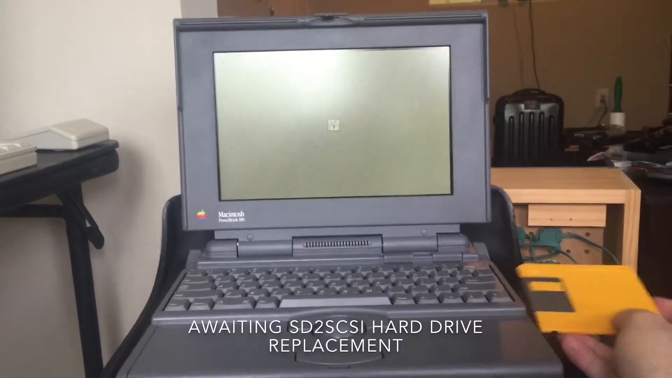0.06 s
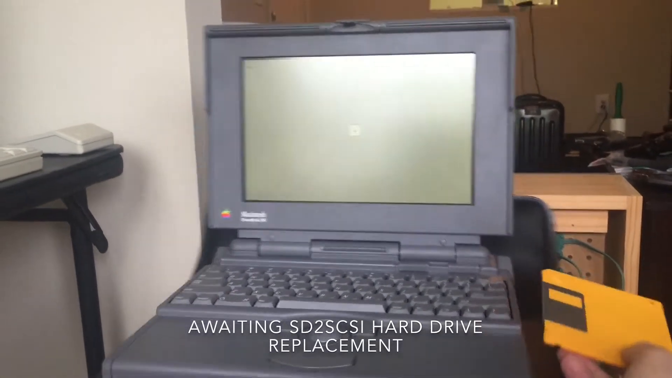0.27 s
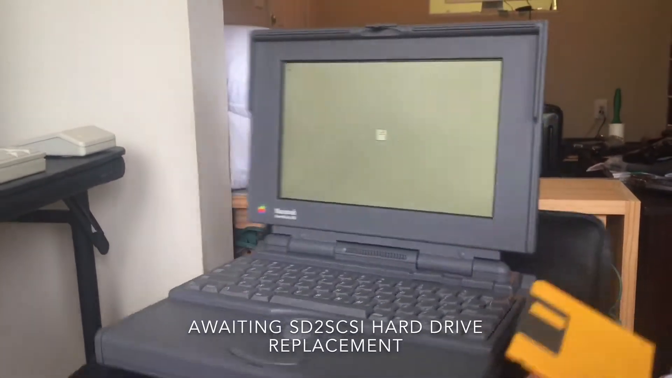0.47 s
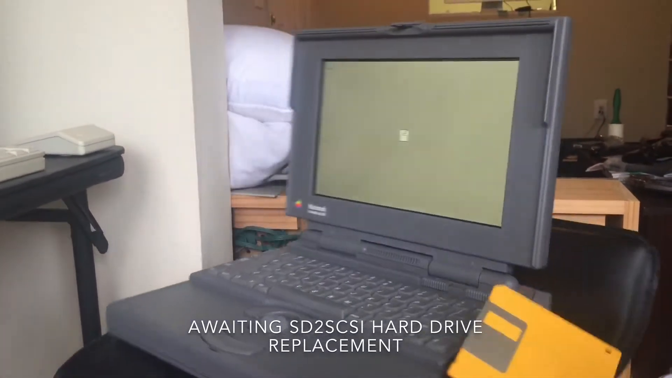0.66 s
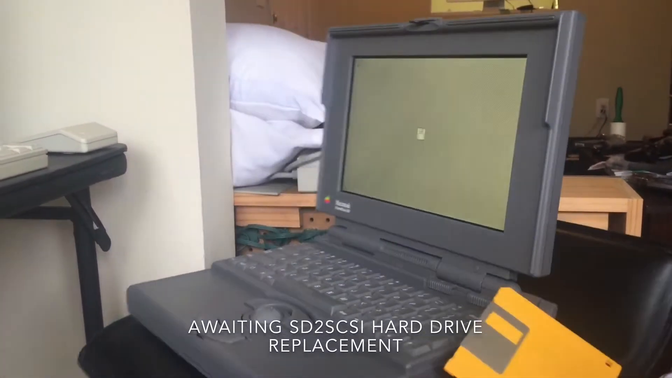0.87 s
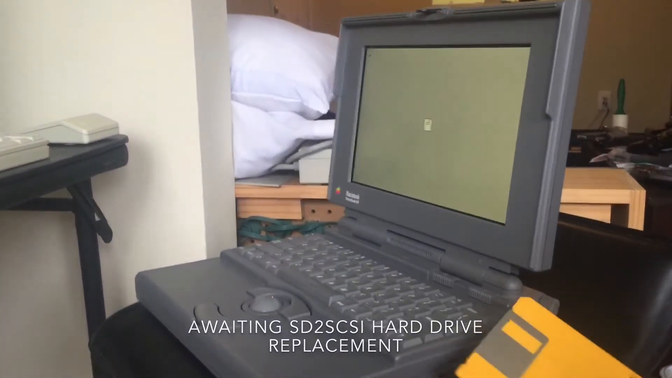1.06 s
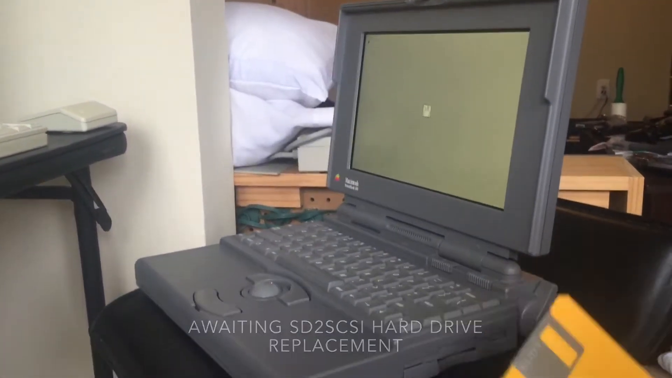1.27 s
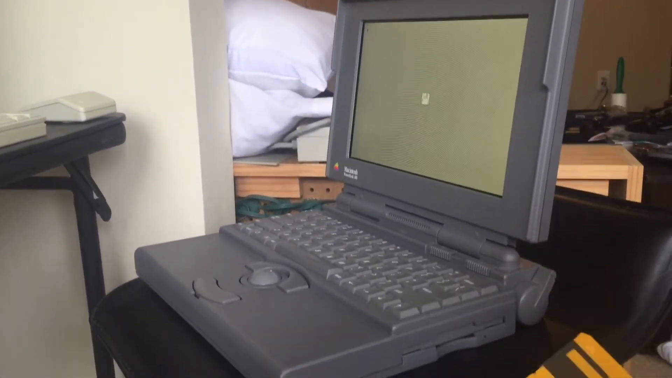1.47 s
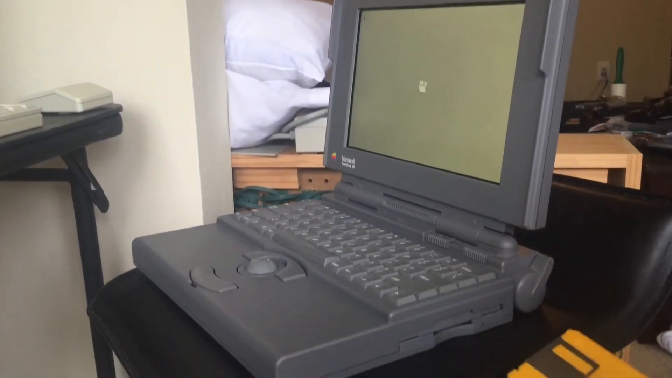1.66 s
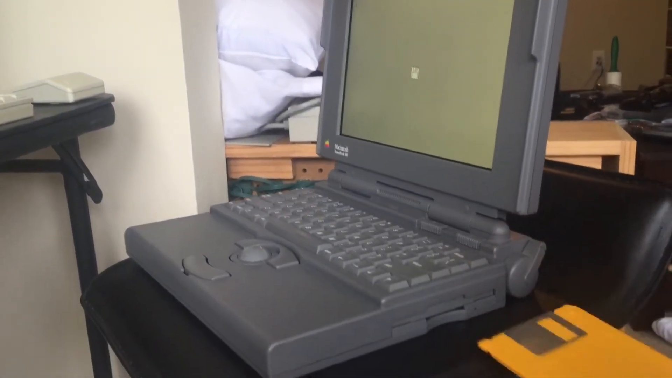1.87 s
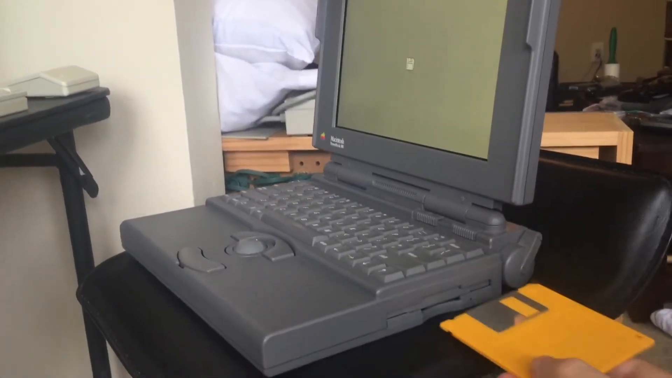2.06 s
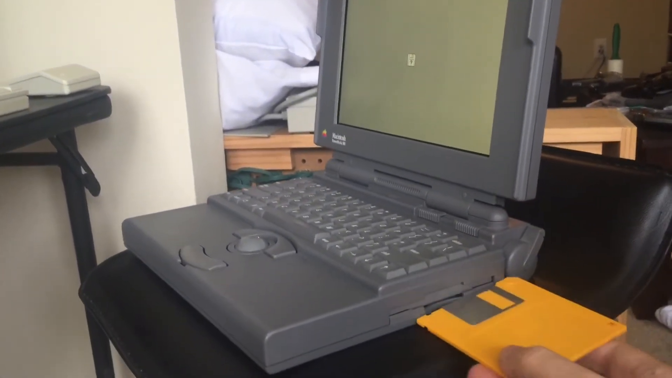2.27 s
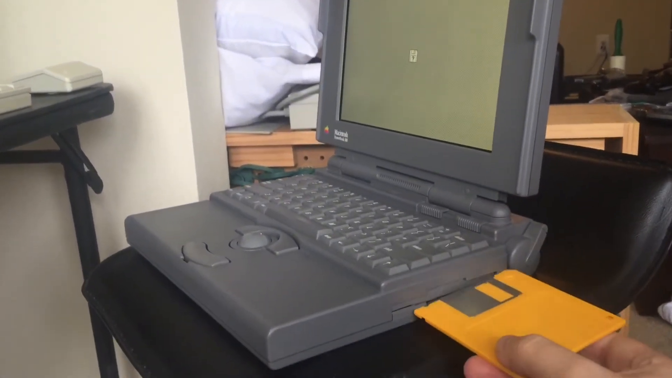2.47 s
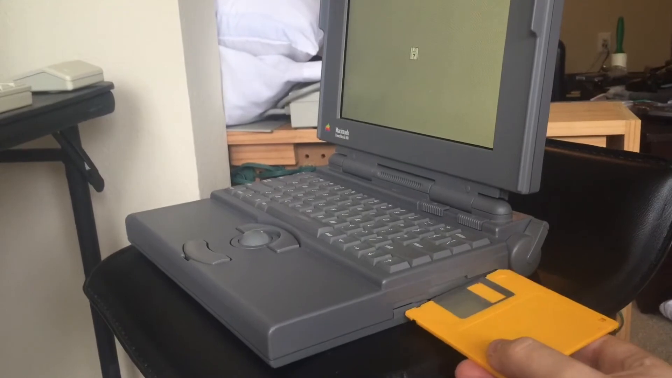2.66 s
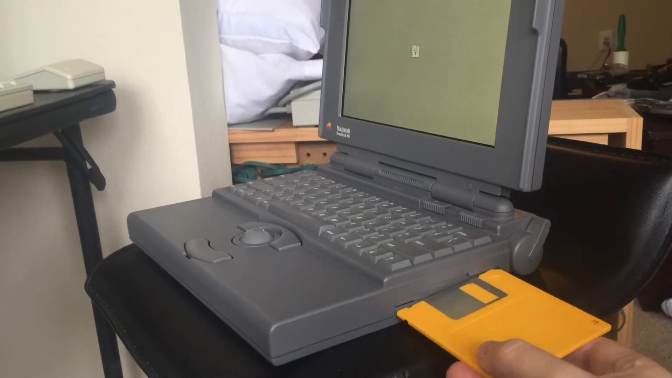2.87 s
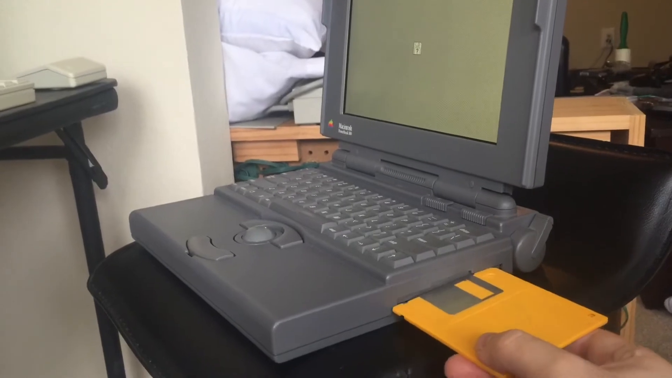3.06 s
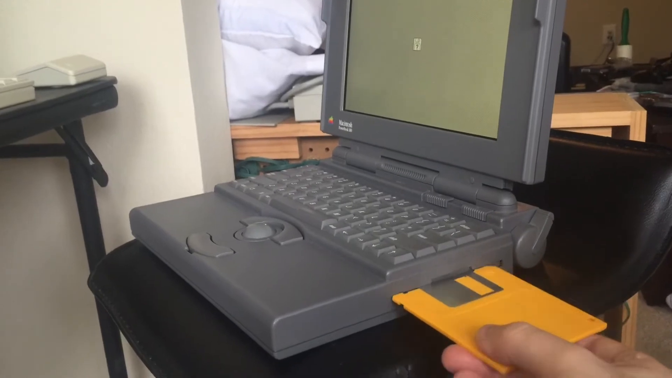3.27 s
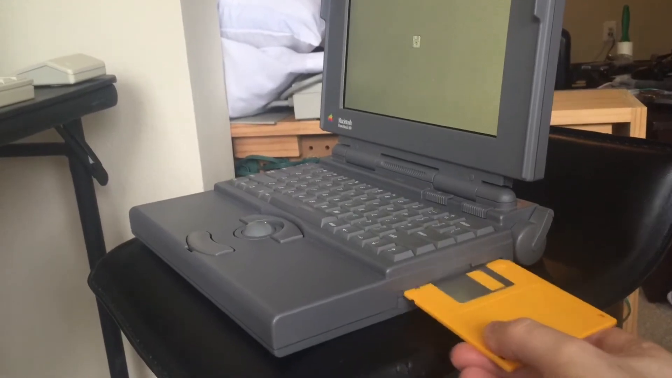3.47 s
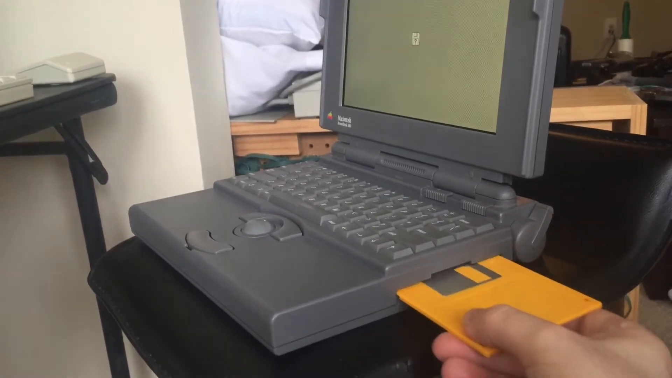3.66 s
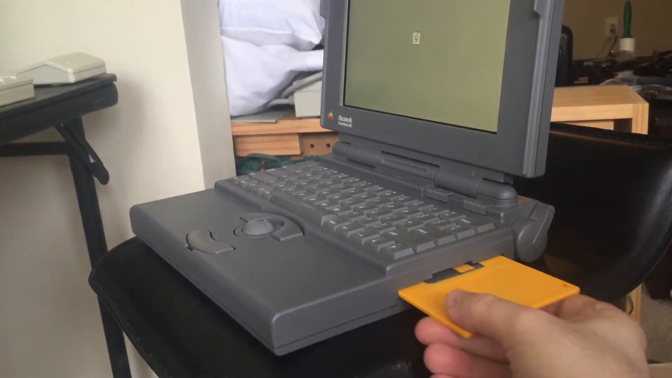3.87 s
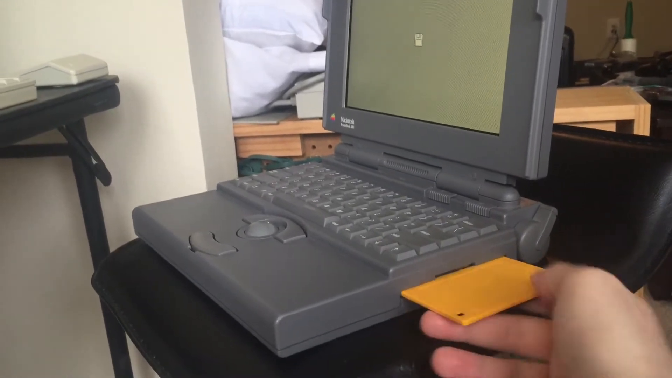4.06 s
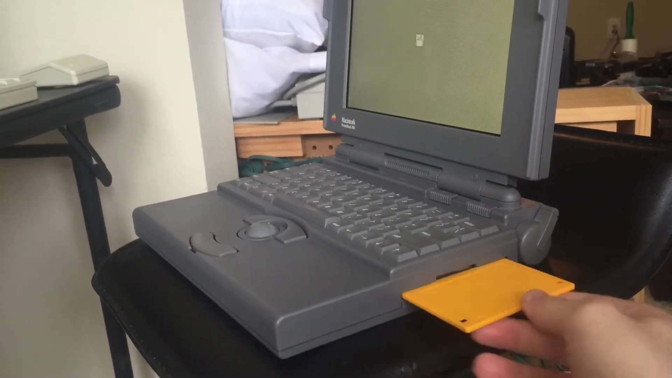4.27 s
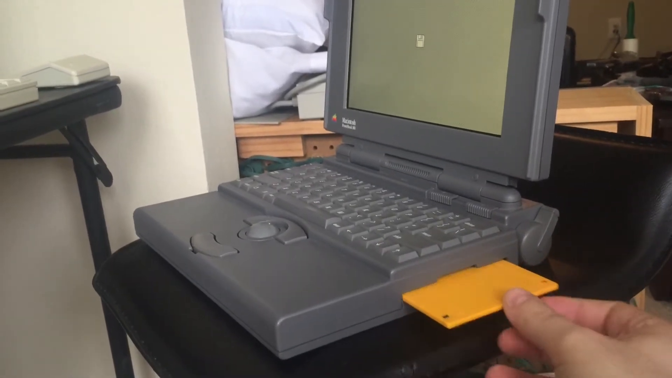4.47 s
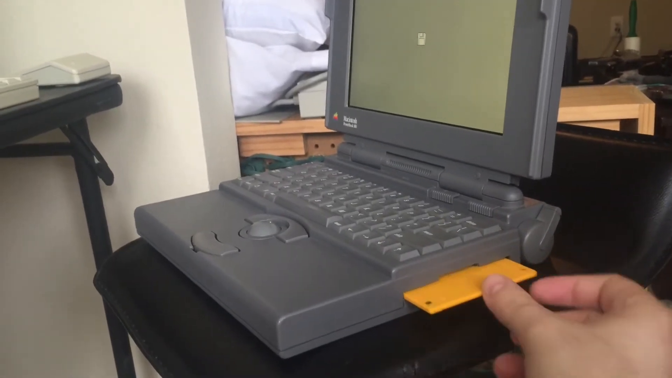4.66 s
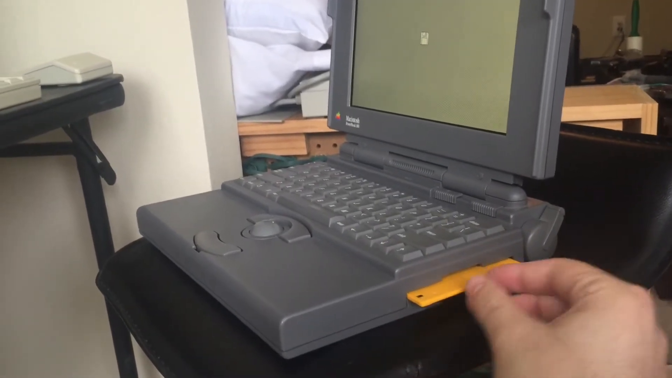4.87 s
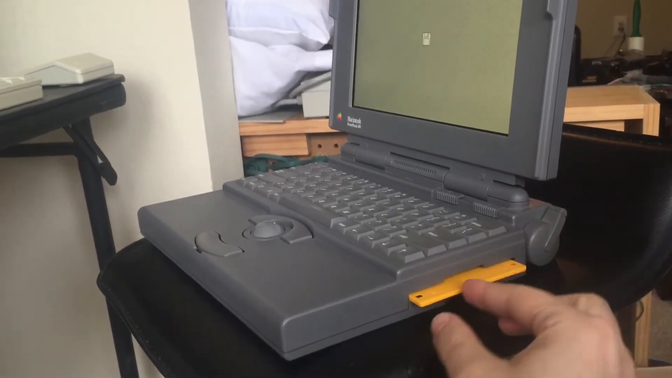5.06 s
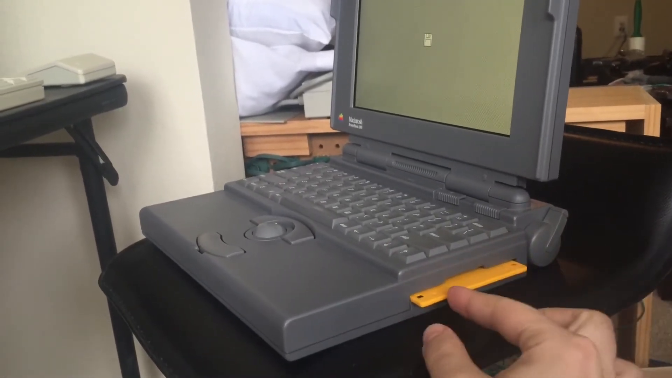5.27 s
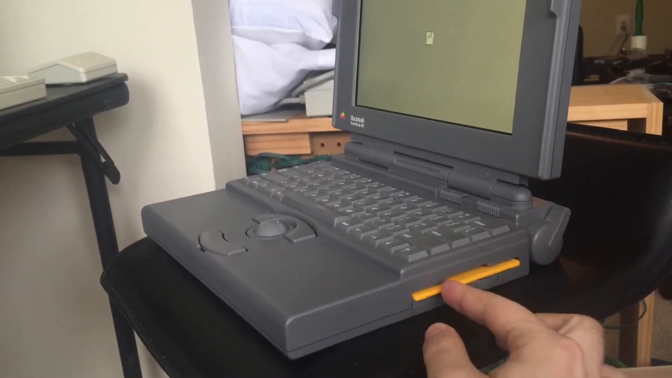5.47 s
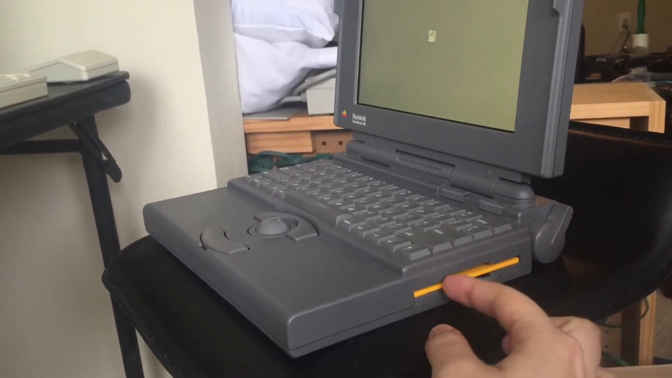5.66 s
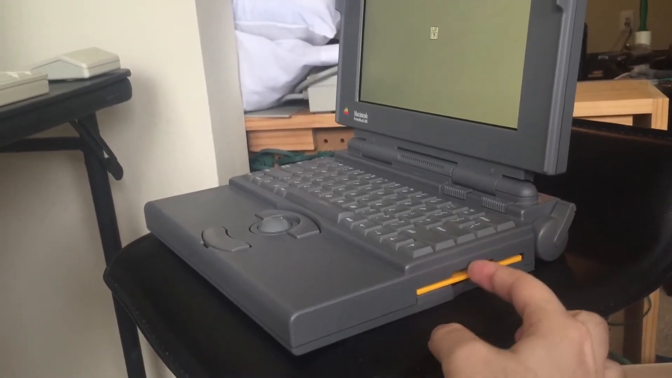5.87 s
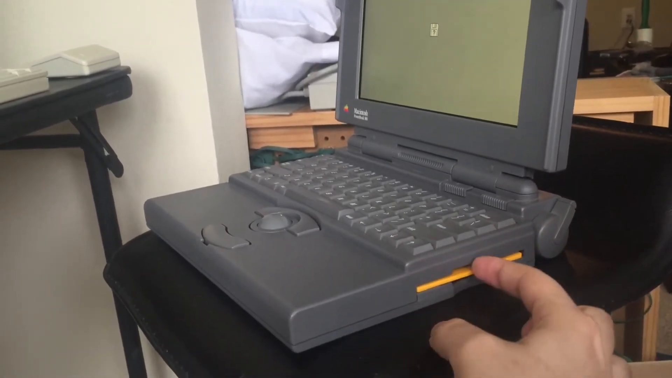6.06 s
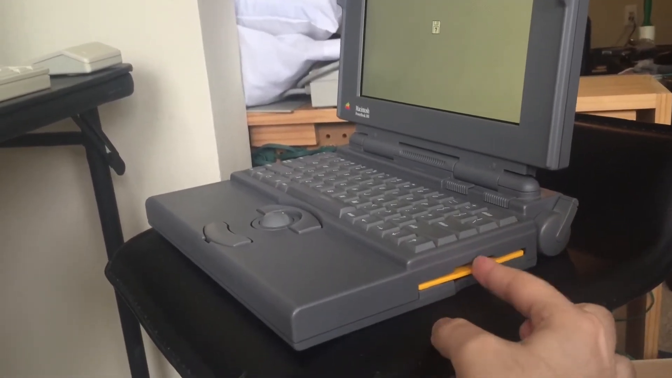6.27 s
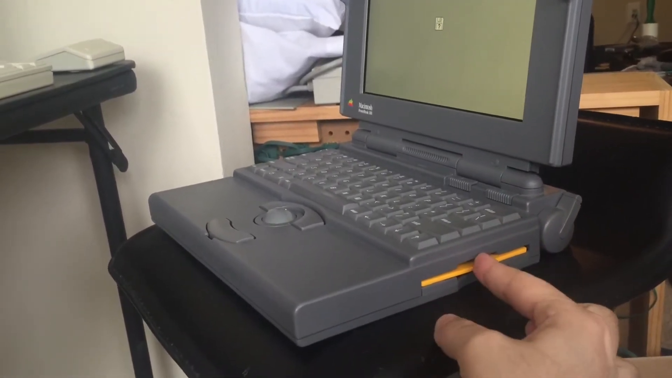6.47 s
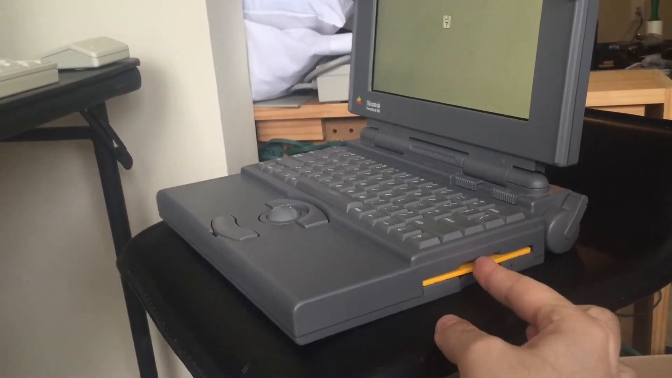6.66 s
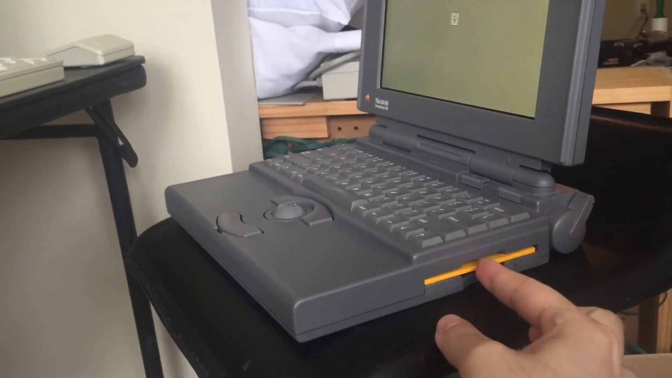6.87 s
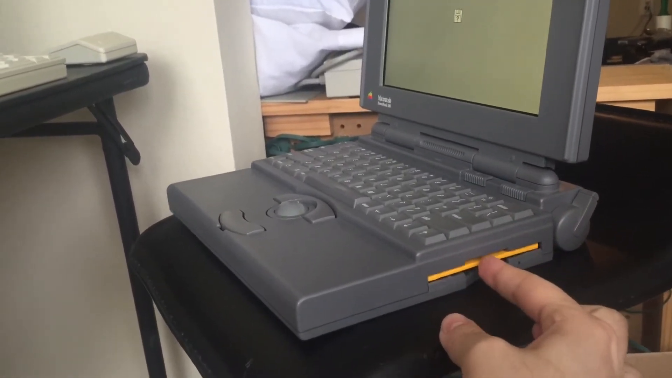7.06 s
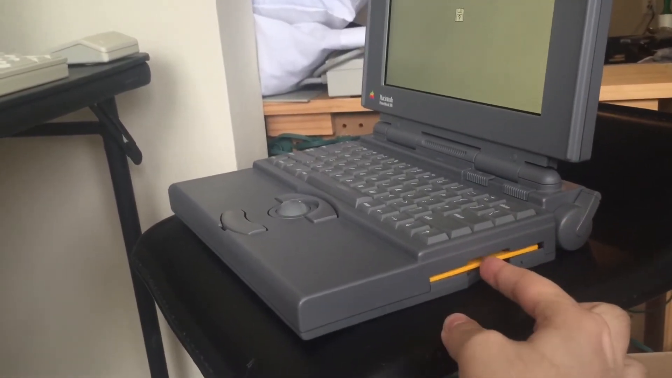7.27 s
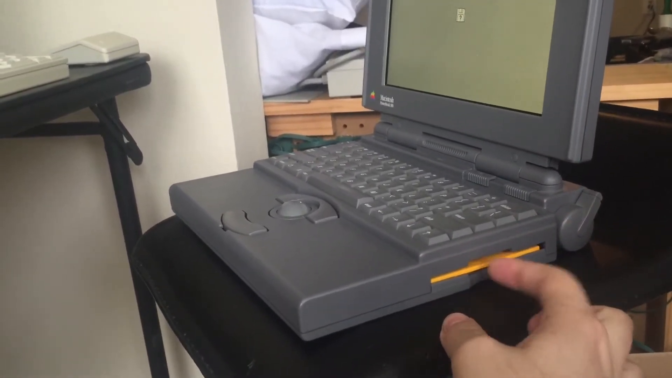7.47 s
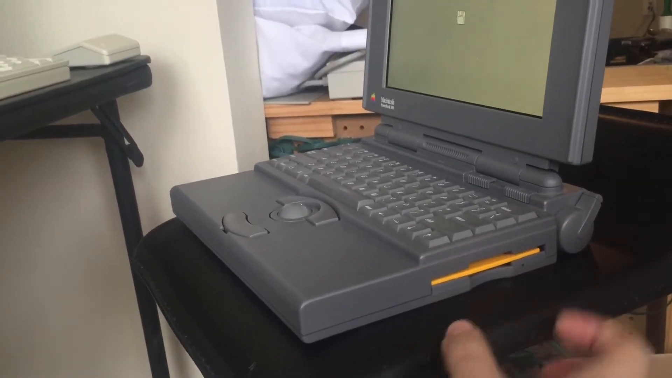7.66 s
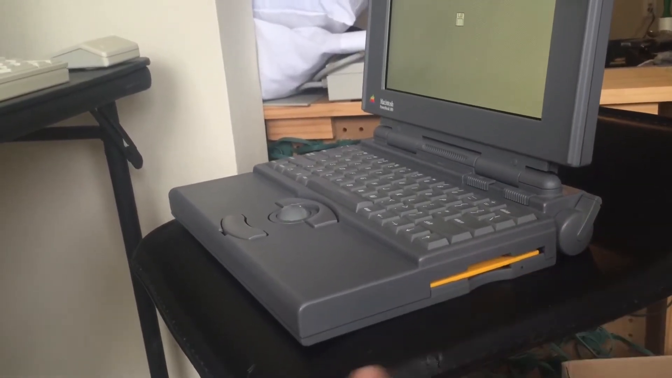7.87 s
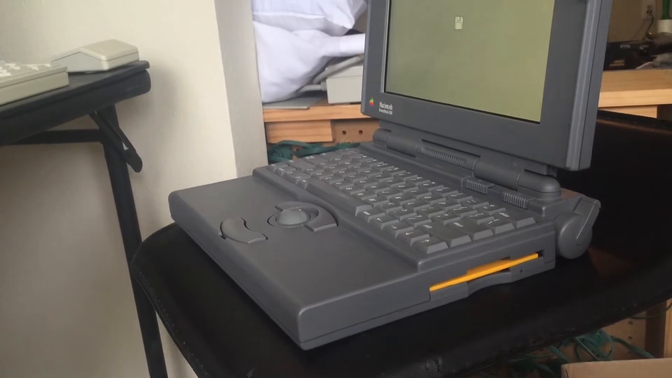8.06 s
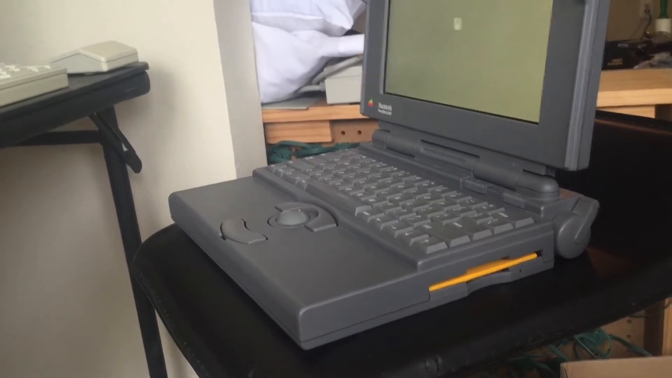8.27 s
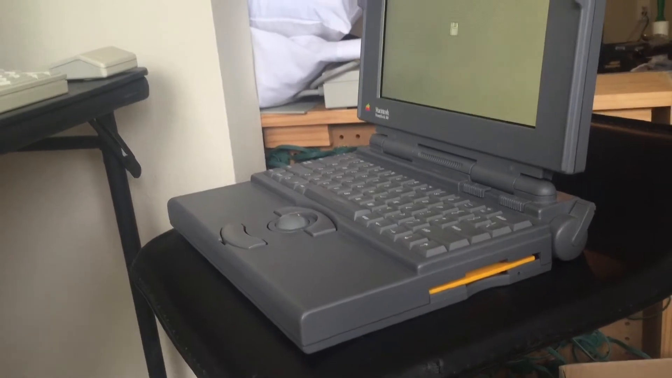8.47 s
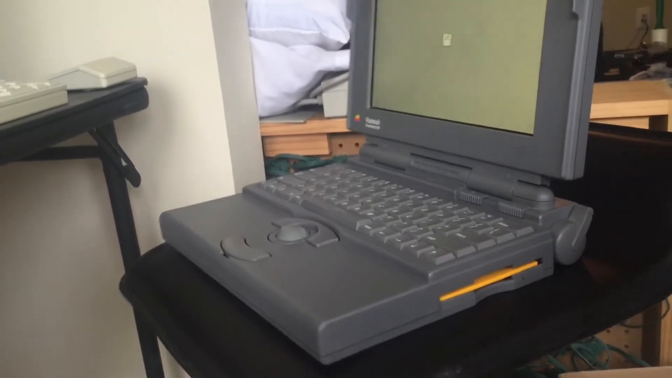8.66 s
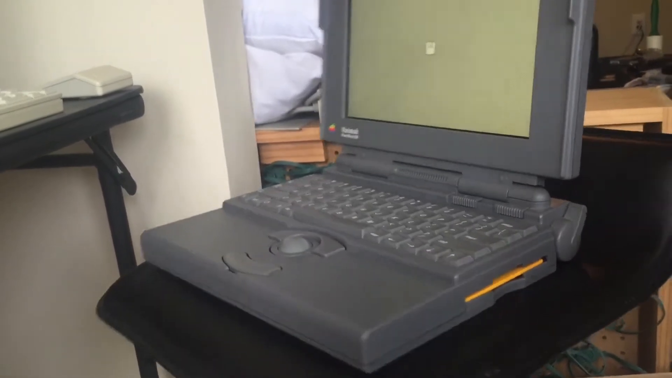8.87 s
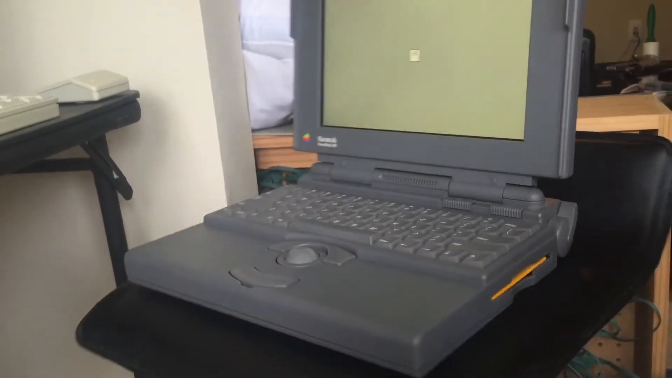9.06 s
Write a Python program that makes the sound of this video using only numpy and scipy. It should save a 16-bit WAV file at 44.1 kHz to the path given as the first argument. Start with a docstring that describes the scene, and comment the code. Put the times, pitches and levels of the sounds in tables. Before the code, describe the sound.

A plastic floppy disk taps and scrapes into a laptop slot, squeaks briefly, then snaps down with a rattling clunk in a quiet room.

```python
"""Floppy disk into a laptop slot

A hand fits a plastic disk into the side slot of a laptop on a padded stool, a phone close by.
The disk taps, scrapes and slides in, then the sprung carrier snaps down with a rattling clunk: bursts of
tiny random impacts ring damped case modes. Sines make the spring tones, thuds, low bumps and mains hum;
shaped noise makes the room tail, rumble and hiss."""
import sys
import numpy as np
from scipy import signal
from scipy.fft import rfft, irfft, next_fast_len
from scipy.io import wavfile
from scipy.ndimage import uniform_filter1d

SR = 44100
rng = np.random.default_rng(int(sys.argv[2]) if len(sys.argv) > 2 else 0)


def file_out(sig):
    """Save sig as 16-bit WAV at sys.argv[1]."""
    # one column per channel
    cols = np.atleast_2d(sig).T
    # limit, then scale
    lim = np.clip(cols, -1, 1)
    pcm = np.round(lim * 32767).astype(np.int16)
    wavfile.write(sys.argv[1], SR, pcm)


N = 401880

# Main modes of the laptop case. Each row: nominal frequency in Hz, relative level in dB, t60 in s.
CASE = [(945, 1, 0.038), (1087.5, 0.85, 0.033), (1205, 1, 0.038), (1326, 0.29, 0.035), (1457, -1, .025),
        (1549, -1.2, .025), (1643, 0, 0.03), (1771, 0, 0.028), (1952, 0, .03), (2070, 1.5, 0.028),
        (2227, 0, .025), (2444, 0, 0.021), (2720, -1.4, 0.017), (2980, -4, 0.018)]
# Low, hollow case modes. Each row: nominal frequency in Hz, relative level in dB, t60 in s.
HOLLOW = [(364, -11, 0.03), (419, -3, .035), (516, -1, 0.036), (601, -0.5, .045), (680.6, -2.5, 0.035),
          (810, -4, .035)]
# Bright case modes. Each row: nominal frequency in Hz, relative level in dB, t60 in s.
BRIGHT = [(3350, -4.5, .006), (3730, -1, 0.0074), (4070, 0, 0.0099), (4434, 0.5, 0.0077), (4750, 1, .006),
          (5330, 1, 0.006), (5660, -0.5, 0.0063), (6155, -4.5, 0.0054), (6970, -6.5, 0.0056)]
# Crisp top modes. Each row: nominal frequency in Hz, relative level in dB, t60 in s.
CRISP = [(7680, -5, 0.003), (8430, -4, 0.0018), (9750, -3.5, 0.0038), (10160, -1.5, 0.0027),
         (11400, -2.5, 0.0037), (12600, -5.5, .002), (13900, -4.5, 0.0022), (15000, -7.5, 0.0018)]
PARTS = CASE, HOLLOW, BRIGHT, CRISP


def undb(db):
    """Decibels to gain."""
    return 10 ** (np.asarray(db) / 20)


def unit(x):
    """Scale to rms 1."""
    return x / np.sqrt(np.mean(x ** 2))


def fade(t, t60):
    """Exponential decay, 60 dB down at t60."""
    return np.exp(-np.log(1000) * t / t60)


def add(out, start_s, x):
    """Mix x into out from start_s."""
    i = int(start_s * SR)
    out[i:i + len(x)] += x[:N - i]


def slow(rate_hz):
    """Smoothed noise, rms 1, that changes about rate_hz times a second."""
    return unit(uniform_filter1d(rng.standard_normal(N), size=int(SR / rate_hz)))


def ring(modes, chance, focus_hz=None):
    """Modal impulse response; the place of contact detunes and weighs modes and favours those near focus_hz."""
    focus_octaves, focus_db = 0.5, 10
    hz, db, t60 = np.transpose(modes)[:, :, None]
    if focus_hz:
        db = db + focus_db * np.exp(-(np.log2(hz / focus_hz) / focus_octaves) ** 2)
    t = np.arange(int(t60.max() * SR) + 1) / SR
    detune, weigh = chance[:2 * len(modes)].reshape(2, -1, 1)
    push = np.minimum(t * hz / 1.5, 1) ** 2  # plastic gives: the blow lasts about a cycle
    tones = np.sin(2 * np.pi * hz * (1 + 0.016 * detune) * t)
    return (undb(db + 1.8 * weigh) * push * fade(t, t60) * tones).sum(axis=0)


def contacts(table, rise, sparse):
    """Each contact is a burst of tiny impacts that rings the four parts of the case."""
    level_ms = 8  # a part's level is its rms over this time, or over the nominal length if longer
    out = np.zeros(N)
    size = SR // 8  # longest burst: 125 ms
    chance = rng.standard_normal((len(table), size))
    places = rng.standard_normal((len(table), 4, 32))
    for row, grit, place in zip(table, chance, places):
        start_s, db, focus_hz, hollow_db, bright_db, crisp_db, ms = row
        u = np.arange(min(int(ms * SR / 700) + 1, size)) / (ms * SR / 1000)  # time in lengths
        hits = grit[:len(u)]
        envelope = np.minimum((u + .01) / rise, 1) * np.exp(-u ** 4)
        impacts = np.abs(hits) ** sparse * np.sign(hits) * envelope
        root_samples = np.sqrt(max(ms, level_ms) * SR / 1000)
        shares_db = 0, hollow_db, bright_db, crisp_db
        for share_db, modes, at, hz in zip(shares_db, PARTS, place, (focus_hz, None, None, None)):
            part = signal.fftconvolve(impacts, ring(modes, at, hz))
            add(out, start_s, undb(db + share_db) * root_samples * part / np.linalg.norm(part))
    return out


def background():
    """Room air and hiss, a low rumble that swells and sinks, and slightly wavering mains lines."""
    # Noise spectrum. Each row: frequency in Hz, relative density in dB per Hz.
    air_rows = [(20, -23.5), (43, -3.5), (62, 0), (85, -3.5), (100, -12.5), (150, -17), (210, -15),
                (400, -23.5), (760, -25), (1950, -30), (2500, -35), (4500, -38), (10500, -44.5),
                (15500, -45.5)]
    # Rumble level ahead of its random swells. Each row: time in s, relative level in dB.
    rumble_rows = [(0, -63), (1.1, -66), (1.9, -65), (2.8, -65.5), (4.4, -60), (5.7, -63.5), (7, -62),
                   (8, -63.5), (9.11, -64)]
    # Mains lines. Each row: frequency in Hz, level in dB rms ahead of the waver.
    hum_rows = [(60, -73.5), (120, -71.5), (240, -79.5), (360, -81.5)]
    air_db = -64
    lumpy_db, lumps_per_s = 2, 4.6
    size = next_fast_len(N)
    f, t = np.fft.rfftfreq(size, 1 / SR), np.arange(N) / SR
    hz, db = np.transpose(air_rows)
    noise = rfft(rng.standard_normal(size)) * undb(np.interp(np.log(f + 1), np.log(hz), db))
    low = 1 / (1 + (f / 88) ** 12)  # split near 88 Hz
    air, rumble = (unit(irfft(noise * share, size)[:N]) for share in (1 - low, low))
    dull = signal.lfilter(*signal.butter(2, 330, fs=SR), air)
    air = air + (undb(3.9 * slow(12) - 1) - 1) * dull  # the lower air is lumpy
    rumble = rumble / np.sqrt(uniform_filter1d(rumble ** 2, size=int(.3 * SR)) + 0.35)  # even out swings
    hum = sum(undb(g) * np.sqrt(2) * np.sin(2 * np.pi * h * t) for h, g in hum_rows)
    air = undb(air_db + 0.77 * slow(2.5)) * air
    rumble_db = np.interp(t, *np.transpose(rumble_rows)) + lumpy_db * slow(lumps_per_s)
    return air + undb(rumble_db) * rumble + undb(0.98 * slow(4)) * hum


def thuds():
    """Dull blows through the stool, and its longer wobble: each a low, damped swing."""
    # Thuds. Each row: start in s, level in dB ahead of the decay, frequency in Hz.
    thud_rows = [(0.828, -36.5, 145), (1.65, -44.5, 288), (1.974, -42.5, 214), (2.665, -69, 170),
                 (3.242, -44, 233), (3.557, -43.5, 235), (4.482, -44, 292), (7.268, -33, 323.8),
                 (7.604, -46, 293), (7.668, -42, 183.7)]
    # The stool's wobble. One row: start in s, level in dB ahead of the decay, frequency in Hz, t60 in s.
    wobble = (0, -41, 59.5, 1.6)
    thud_t60_s = 0.063
    out = np.zeros(N)
    for start_s, db, hz, t60 in [(*row, thud_t60_s) for row in thud_rows] + [wobble]:
        t = np.arange(int(t60 * SR) + 1) / SR
        swing = np.minimum(4 * t * hz, 1) * fade(t, t60) * np.sin(2 * np.pi * hz * t)
        add(out, start_s, undb(db) * swing)
    return out


def taps():
    """Each tap is a short blow; the loose shell of the disk then rattles, at its own hollow share."""
    # Taps. Each row: start in s, case part level in dB, favoured case pitch in Hz, then in dB re the
    # case part the hollow, bright and crisp parts of the blow, and the rattle's case part re the blow's.
    tap_rows = [(0.003, -29, 1220, -15, -21, -37, -14), (0.0233, -30.5, 1800, -16, -15.5, -26, -11.5),
                (0.031, -30, 1190, -17, -11.5, -39, -16.5), (0.5315, -52.5, 1500, -10, -29, -29, -18),
                (1.652, -40.5, 1500, -25, -7.5, -16.5, -17.5), (1.8287, -51.5, 1350, -11, -16, -31, -16),
                (1.977, -47.5, 1790, -4.5, -10, -16.5, -24), (2.3232, -35, 1340, -27, -17.5, -27, -13),
                (2.3534, -40.5, 1410, -5.5, -16.5, -26, -12), (2.7679, -64, 1740, -16, -2.5, -7, -4),
                (2.8951, -54, 2190, -26, -7, -24, -12), (3.101, -61, 1750, -13, -15, -20, -19),
                (3.2074, -63, 1500, -11, -3, -6, -12), (3.2354, -49.5, 1360, 4, 6.5, -5, -5),
                (3.243, -39.5, 1270, -14, -15, -25, -8), (3.2588, -36.5, 1840, -5, -3.5, -11, -4),
                (3.2738, -45.5, 1760, -17, -12, -4, -9), (3.2826, -41, 1880, -11, 2, -8, -20),
                (3.3566, -56.5, 2000, -9, -11, -21, -24), (3.4376, -45.5, 1620, -17, -16, -30, -6),
                (3.4744, -57, 2520, -14, -6, -14, -9), (3.4906, -49.5, 1610, 2, -4.5, -18, -13),
                (3.565, -57, 1960, -14, -3, -8, -11), (3.6321, -56, 1860, -11, 3, -14, -20),
                (3.7181, -37, 1290, -15, -9, -25, -15), (3.9083, -46, 1730, -12, -15, -23, -6.5),
                (4.8015, -52.5, 2020, -25, -13, -19, -14), (4.8956, -53.5, 1670, -13, -13, -25, -7.5),
                (4.941, -59.5, 1670, -8, -12, -21, -19), (5.017, -50, 1700, -11, -20, -32, -18),
                (5.0225, -56, 1360, -1.5, -17, -32, -17), (5.3884, -57, 1560, -3, -12, -6.5, -15),
                (5.4663, -51.5, 1600, -4.5, -16, -33, -8), (5.5857, -39.5, 2150, -10, -13, -19, -15),
                (7.2568, -33.5, 1900, -20, 5, -3, -15), (7.26, -28, 1930, -25, 4, 1.5, -15),
                (7.2661, -32, 1700, -9, 1, -7, -8), (7.2724, -28, 1770, -7, -7, -15, -15),
                (7.4041, -45.5, 1730, -8, -10, -19, -8.5), (7.42, -35, 2130, -20, -14.5, -20, -15),
                (7.4318, -39.5, 1370, -13, -3.5, -4.5, -11.5), (7.444, -57, 1580, -2, 2, -2, -11.5),
                (7.6039, -52.5, 1470, -1.5, -22, -21, -7.5), (7.674, -60.5, 1350, 2, -21.5, -18.5, -22.5)]
    blow_ms = 1.07
    rattle_late_s, rattle_ms = 0.004, 24
    rattle_hollow_db, rattle_dull_db = -7, -1.5  # hollow share; change of bright and crisp shares
    s, db, hz, hollow_db, bright_db, crisp_db, rattle_db = np.transpose(tap_rows)
    every = np.ones(len(s))
    blows = np.transpose([s, db, hz, hollow_db, bright_db, crisp_db, blow_ms * every])
    rattles = np.transpose([s + rattle_late_s, db + rattle_db, hz, rattle_hollow_db * every,
                            bright_db + rattle_dull_db, crisp_db + rattle_dull_db, rattle_ms * every])
    return contacts(blows, rise=0.044, sparse=2.5) + contacts(rattles, rise=0.14, sparse=2.1)


def scrapes():
    """Scrapes, and the clunk's rattle dying into the room: longer, denser bursts of impacts than the blows."""
    # Scrapes and the clunk's rattle. Each row: start in s, case part level in dB, favoured case pitch in
    # Hz, hollow, bright and crisp parts in dB re the case part, nominal length in ms (cut at 125 ms).
    scrape_rows = [(0.004, -30.5, 1130, -19, -26, -26, 11.3), (0.024, -29, 1260, -16, -19, -31, 7.4),
                   (0.045, -54, 1510, -12, -15, -25, 50), (1.915, -77, 1630, 4, 6, 1, 83),
                   (2.497, -53, 1380, 1.5, -21, -33, 37), (2.535, -62, 1280, -8, -23, -29, 25),
                   (3.31, -61, 1900, -14, -18, -21, 27), (3.424, -54.5, 1500, -10, -12, -25, 14),
                   (3.465, -51, 2000, -4, -3.5, -20, 32), (3.62, -59.5, 1760, -4, -5.5, -19, 22),
                   (3.684, -56, 1730, -18, -15, -21, 55), (3.81, -52, 1640, -13, -17, -30, 51),
                   (3.874, -56.5, 1890, -12, -12, -15, 78), (3.983, -56.5, 1730, -19, -15, -19, 35),
                   (5.575, -48.5, 1510, -2.5, -10, -13.5, 10), (5.8, -56.5, 1700, -12, -14, -23, 26),
                   (5.821, -39.5, 1530, -14.5, -23.5, -30.5, 41), (5.866, -57.5, 1510, -1, -26, -35, 27),
                   (6.006, -46, 1590, -8, -22, -33, 23), (6.155, -61.5, 1450, -6, -24, -26, 30),
                   (7.247, -48, 2450, 1, -14, -21, 7.2), (7.2555, -25, 1900, -14, -6, -0.5, 19),
                   (7.285, -46, 1720, -2, -6, -9, 35), (7.32, -58.5, 1730, -13, -6, -8, 260)]
    return contacts(scrape_rows, rise=0.08, sparse=2.1)


def room(x):
    """Walls and furniture send back a short, duller tail: decaying low-passed noise."""
    room_db, room_t60_s, room_dull_hz = -16, .27, 8000
    t = np.arange(SR // 2) / SR
    tail = rng.standard_normal(len(t)) * fade(t, room_t60_s) * np.minimum(t / .008, 1)
    tail = signal.lfilter(*signal.butter(1, room_dull_hz, fs=SR), tail)
    return undb(room_db) * signal.oaconvolve(x, tail / np.linalg.norm(tail))[:N]


def bumps():
    """Soft low bumps in the rumble: a few cycles under a Gaussian swell."""
    # Bumps. Each row: middle in s, peak in dB, frequency in Hz.
    bump_rows = [(1.26, -46.5, 60.4), (1.315, -46, 67.5), (1.46, -48, 63.6), (1.65, -54.5, 66),
                 (2.67, -51, 62), (3.31, -51.5, 62), (4.04, -49, 66), (4.55, -51, 59.6), (4.8, -50, 63.6),
                 (5.13, -47, 65.5), (5.33, -47.5, 62), (5.61, -46, 63), (5.71, -49, 62), (5.891, -51, 65),
                 (6.191, -48.5, 59), (6.47, -50.5, 60), (6.62, -51, 56), (6.77, -47.5, 62),
                 (6.888, -53, 71), (7.19, -52, 60), (7.74, -49.5, 64.3), (8.08, -53, 72), (8.73, -50, 68.2)]
    half_width_s = 0.019
    out = np.zeros(N)
    t = np.arange(-3 * half_width_s, 3 * half_width_s, 1 / SR)
    for middle_s, db, hz in bump_rows:
        bump = np.exp(-(t / half_width_s) ** 2) * np.cos(2 * np.pi * hz * t)
        add(out, middle_s + t[0], undb(db) * bump)
    return out


def spring():
    """A pressed spring in the slot sings: short rough tones that sag in level and stop when let go."""
    # Spring tones. Each row: start in s, level in dB ahead of sag and waver, frequency in Hz, length in ms.
    spring_rows = [(2.33, -43.5, 674, 38), (3.436, -47, 592, 28), (3.489, -43.5, 585, 48),
                   (3.622, -51, 586, 18), (5.828, -39, 609, 34), (5.866, -40.5, 700, 27),
                   (6.009, -45, 617, 12), (6.03, -45, 640, 11), (6.178, -54.5, 602, 18),
                   (7.325, -47.5, 676, 170)]
    out, waver = np.zeros(N), undb(2.4 * slow(90))
    for start_s, db, hz, ms in spring_rows:
        t = np.arange(int(ms * SR / 600)) / SR
        u = 1000 * t / ms  # time in lengths
        envelope = undb(db - 3.5 * u) * np.minimum(8 * u, 1) * np.exp(-u ** 6)
        add(out, start_s, envelope * np.sin(2 * np.pi * hz * t))
    return out * waver


def slide():
    """Plastic on plastic: dense slips, unevenly strong; the place of contact moves along the slot."""
    # The long slide into the slot. Each row: time in s, case part level in dB.
    slide_rows = [(4.25, -75.5), (4.475, -62), (4.525, -53.5), (4.615, -57), (4.66, -52.5), (4.7, -60),
                  (4.73, -53.5), (4.812, -57.5), (4.86, -73)]
    focus_hz = 1850
    hollow_db, bright_db = -11, -9  # re the case part
    crisp_db = -77.5  # steady level of the thin hiss on top
    s, db = np.transpose(slide_rows)
    t = np.arange(int(s[0] * SR), int(s[-1] * SR)) / SR
    level_db = np.interp(t, s, db)
    grit = rng.standard_normal(N)
    slips = (grit * np.abs(grit) ** 1.4 * undb(1.5 * slow(77)))[:len(t)]
    places = 1.1 * rng.standard_normal((20, 2 * len(CASE)))
    along = (len(places) - 1) * (t - t[0]) / (t[-1] - t[0])
    shares_db = 0, hollow_db, bright_db + 2.0 * slow(20)[:len(t)], crisp_db - level_db
    rub = np.zeros(len(t))
    for share_db, modes, hz in zip(shares_db, PARTS, (focus_hz, None, None, None)):
        part = np.zeros(len(t))
        for k, at in enumerate(places):  # each stretch of the slot rings the modes in its own mix
            here = np.sqrt(np.maximum(1 - np.abs(along - k), 0))
            part += signal.fftconvolve(slips * here, ring(modes, at, hz))[:len(t)]
        rub += undb(share_db) * unit(part)
    out = np.zeros(N)
    add(out, s[0], undb(level_db) * rub)
    return out


def scene():
    """Everything at the laptop, the room's answer to the contacts, and the background."""
    near = taps() + scrapes() + slide()
    return (near + room(near) + spring() + thuds() + bumps() + background())[None]


def record(dry):
    """The phone cuts the top: a steep elliptic low-pass."""
    top_hz = 15450
    return signal.sosfilt(signal.ellip(10, .2, 60, top_hz, fs=SR, output="sos"), dry)


dry = scene()
out = record(dry)
file_out(out)
```